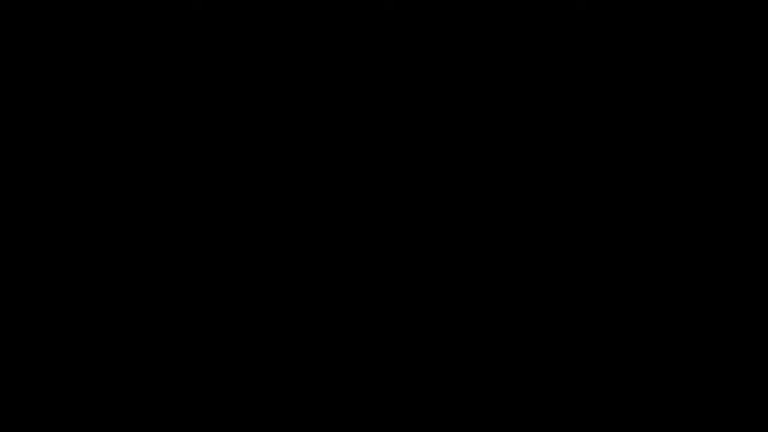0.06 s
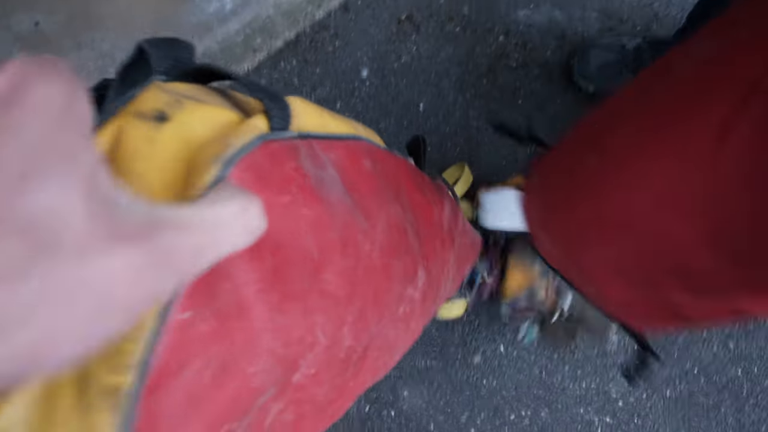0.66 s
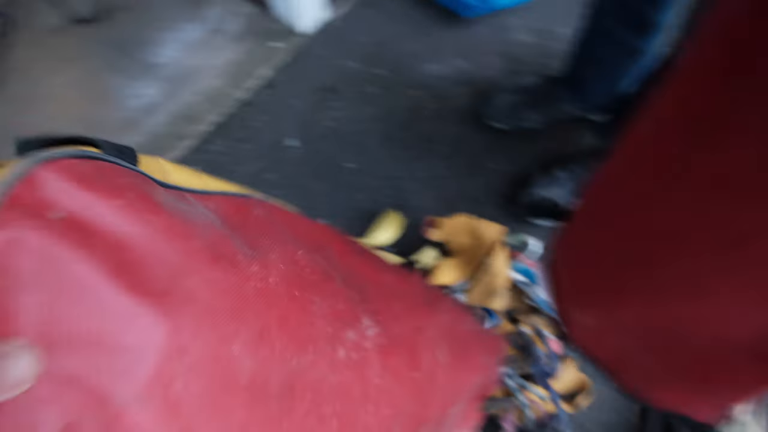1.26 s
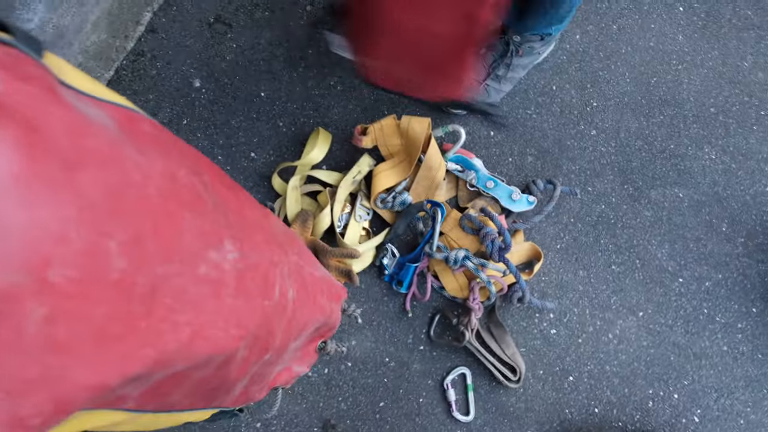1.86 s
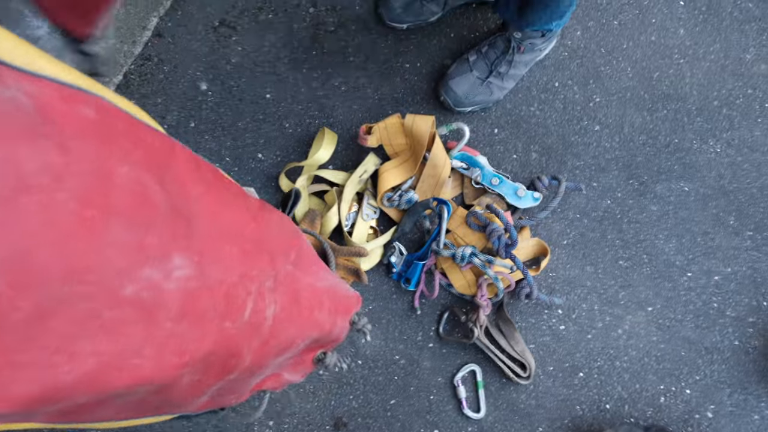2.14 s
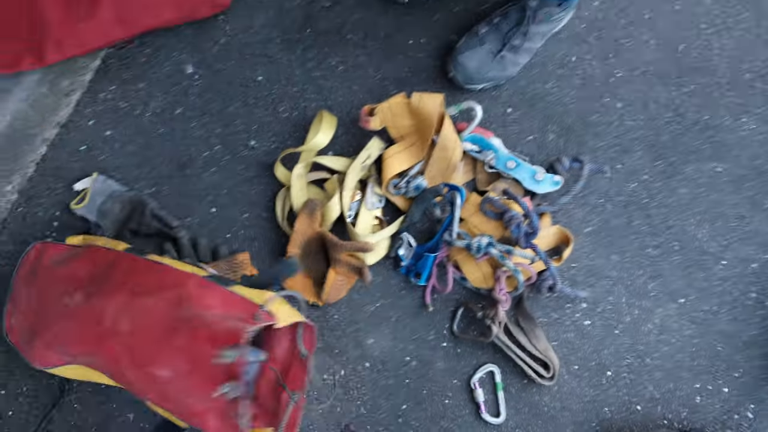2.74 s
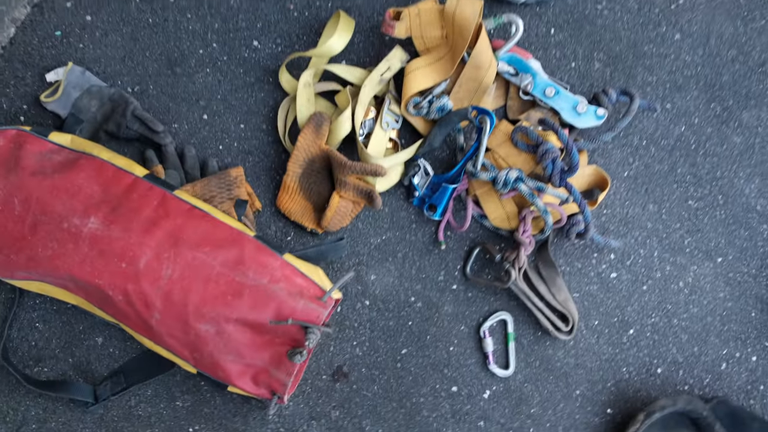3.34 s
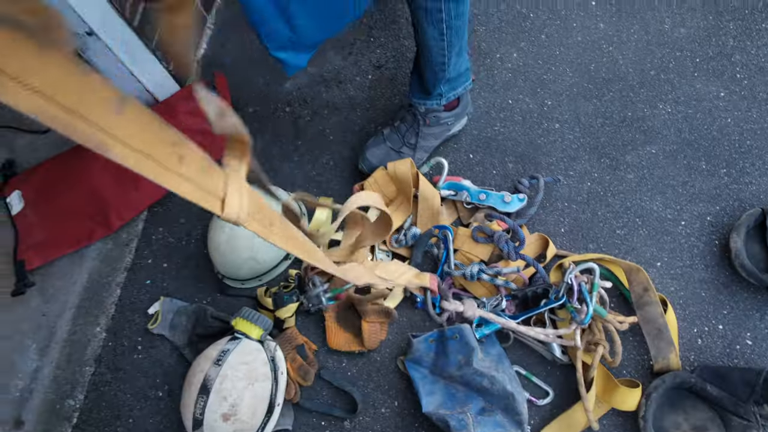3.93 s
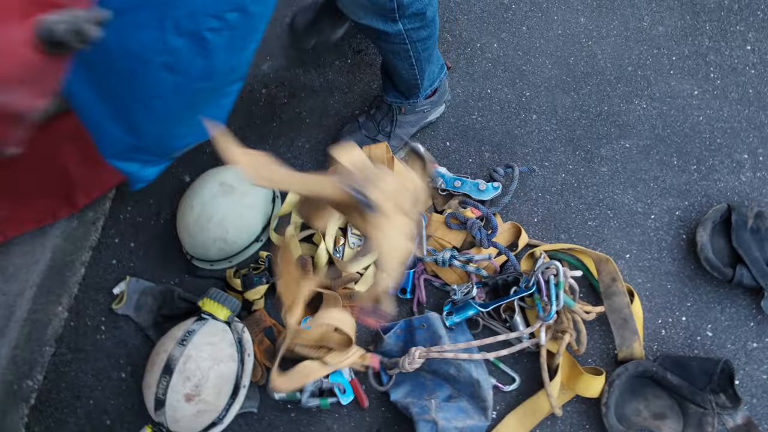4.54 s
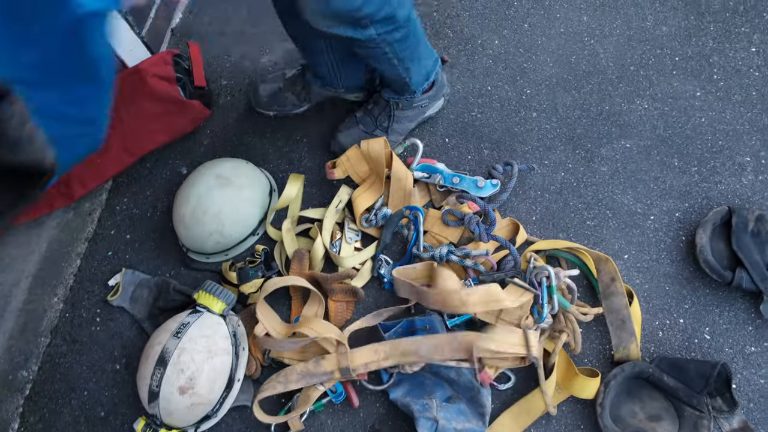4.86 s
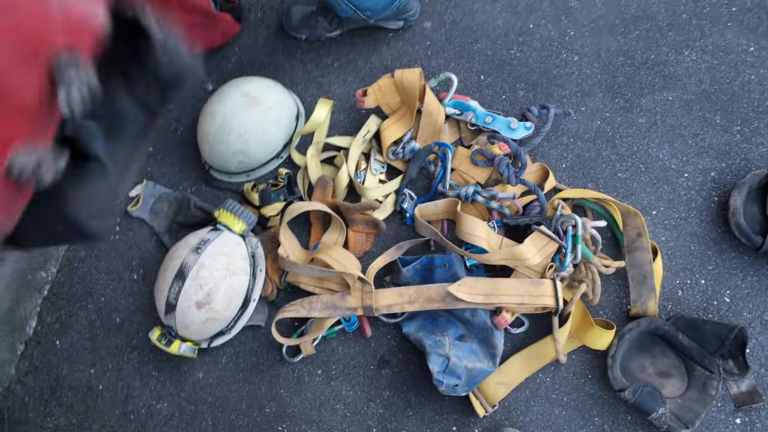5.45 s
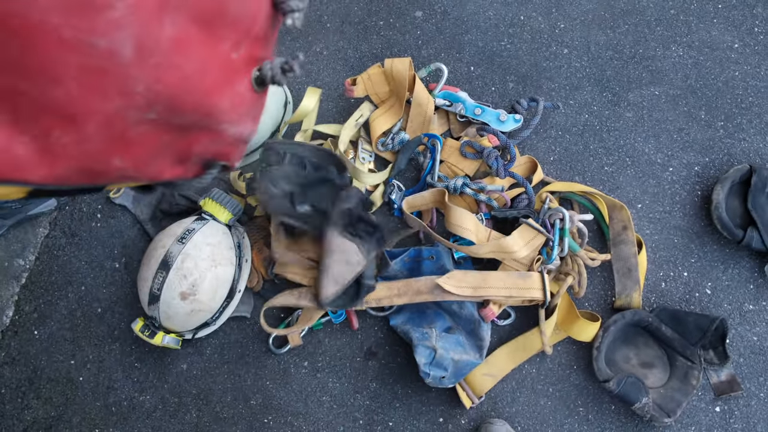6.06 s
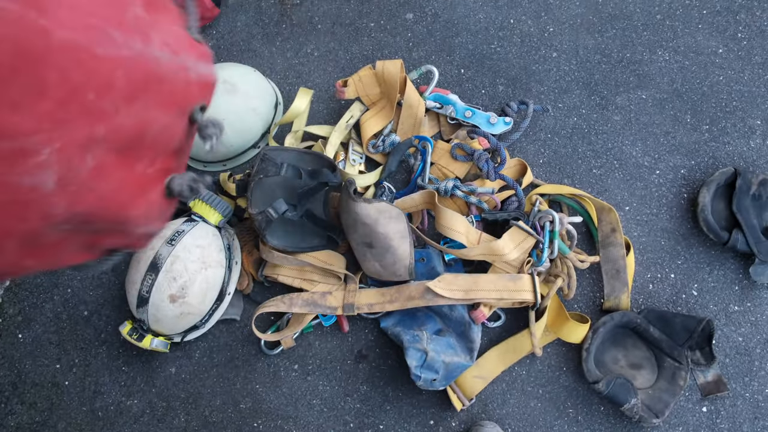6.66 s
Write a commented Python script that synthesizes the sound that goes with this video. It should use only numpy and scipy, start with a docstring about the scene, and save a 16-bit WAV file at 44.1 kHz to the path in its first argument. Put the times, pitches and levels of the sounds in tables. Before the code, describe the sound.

Stiff tarpaulin bags rustle and thump as webbing and clinking metal carabiners are shaken out onto a pile on tarmac outdoors.

```python
"""Outdoors on tarmac: tarpaulin tackle bags are shaken out over climbing gear, an arm's length away.
Webbing drags over the stiff cloth in countless tiny slips; the bag walls crease and thump.
Carabiners clack, mostly muffled by their slings; a few ring on until touched.
Light wind buffets the microphone over a quiet background; a limiter ducks after the hardest hits."""
import sys
import numpy as np
from scipy import signal
from scipy.fft import rfft, irfft, next_fast_len
from scipy.io import wavfile
from scipy.ndimage import uniform_filter1d, minimum_filter1d

SR = 44100
rng = np.random.default_rng(int(sys.argv[2]) if len(sys.argv) > 2 else 0)


def transcribe(signal):
    """Save signal, clipped to [-1, 1], as a 16-bit WAV file at the path in sys.argv[1]."""
    frames = np.atleast_2d(signal).T
    limited = np.clip(frames, -1, 1)
    pcm = np.round(limited * 32767).astype(np.int16)
    wavfile.write(sys.argv[1], SR, pcm)


N = 294896
TIME = np.arange(N) / SR
HIT_TIME = TIME[:SR // 4]
IMPULSE = 1. * (HIT_TIME == 0)

# bag wall flaps or soft gear lands: t/s, thump level/dB, f/Hz, t60/s, fold snap level/dB
FLAPS = [(0.5625, -21.5, 337, 0.1, -32), (0.6605, -18, 322, 0.085, -29), (1.221, -18.5, 342, 0.034, -18),
         (1.2467, -22.5, 290, 0.027, -46), (1.3184, -21, 290, .048, -29.5), (1.392, -21, 228, 0.045, -39),
         (1.795, -22, 274, 0.042, -40), (2.1244, -23, 293, .035, -36), (2.162, -17, 305, 0.075, -22),
         (2.237, -18.5, 400, 0.037, -23), (2.271, -12, 234, 0.02, -24.5), (2.3162, -20, 261, .05, -17),
         (2.3554, -14, 212, 0.026, -29), (2.3756, -12.5, 278, 0.024, -23), (2.449, -10.5, 377, 0.12, -19.5),
         (2.5121, -27, 343, .05, -24), (2.5295, -11.5, 330, 0.064, -17), (2.6151, -10.5, 220, 0.084, -17.5),
         (2.928, -15, 294, .14, -30), (2.951, -14.5, 230, 0.14, -27), (3.277, -30.5, 161, 0.18, -56),
         (4.121, -14, 362, 0.14, -25), (4.133, -11.5, 210, 0.024, -35), (4.693, -21, 410, .05, -29),
         (4.7202, -21, 444, 0.027, -46), (5.1981, -22, 235, 0.054, -34), (5.366, -37, 117, .08, -37),
         (5.655, -17.5, 168, 0.067, -33), (6.341, -18.5, 255, .09, -44), (6.446, -20, 215, 0.052, -35.5),
         (6.6014, -17.5, 348, 0.019, -24), (6.6673, -18, 363, 0.099, -35)]


def rustle(slips_per_s=900, slip_t60_s=0.01, smooth_db=-5, flutter_db=1.72, flicker_db=2.5):
    """Stick-slip releases of uneven size; the cloth's folds keep shifting which bands radiate."""
    # cloth spectrum: f/Hz, level/dB
    cloth = [(45, -1.5), (75, -4), (140, -4.5), (290, -5), (635, -10), (1000, -11.5), (1400, -12),
             (2540, -15), (3410, -18.5), (4600, -18), (7000, -31), (10600, -38), (13300, -44), (16000, -44)]
    low_db, level_db, high_db = 10 * np.log10(drag_power())
    boom_db, hiss_db = low_db - level_db, high_db - level_db
    slips = (rng.random(N) < slips_per_s / SR) * undb(np.minimum(rng.exponential(size=N), 4))
    # each release sets the fibres chattering
    chatter_power = signal.fftconvolve(slips ** 2, fade(slip_t60_s) ** 2)[:N]
    chatter = unit(np.sqrt(abs(chatter_power)))
    drag = np.hypot(chatter, undb(smooth_db)) * rng.standard_normal(N) * undb(flutter_db * walk(110))
    size = next_fast_len(N, real=True)
    spectrum = rfft(unit(colour(drag, cloth)), size)
    octave = np.log2(np.maximum(np.fft.rfftfreq(size, 1 / SR), 1))
    out, step_oct = 0, 2 / 3
    for centre in np.arange(6, 14.5, step_oct):
        band = irfft(spectrum * np.maximum(1 - abs(octave - centre) / step_oct, 0), size)[:N]
        boom = np.interp(centre, np.log2([450, 1400]), [1, 0])
        hiss = np.interp(centre, np.log2([3800, 9000]), [0, 1])
        out = out + band * undb(boom * boom_db + hiss * hiss_db + flicker_db * walk(35))
    return out * undb(level_db)


def drag_power(idle_db=-48.5, idle_boom_db=1.8, idle_hiss_db=0.9):
    """Pulls speed up and die away over a faint shuffle. Rows: bag boom, cloth body, fibre hiss."""
    # webbing or tarpaulin pulled: fastest t/s, attack/s, release/s, level/dB, rel. boom/dB, rel. hiss/dB
    pulls = [(0.453, 0.011, 0.071, -19, -1, 4.5), (0.6, 0.029, 0.057, -25, -1.5, -9),
             (0.68, 0.037, 0.046, -27.5, -0.5, 5), (0.86, 0.22, 0.045, -34, -3.5, 12.5),
             (1.135, 0.085, 0.22, -39, 6, 5.5), (1.42, 0.11, 0.16, -36, 4.5, 7.5),
             (1.515, 0.023, 0.023, -27.5, -7.5, 8.5), (1.588, 0.017, 0.014, -31, -6.5, 11.5),
             (1.70, .07, 0.051, -32.5, -3, 4), (1.93, 0.038, 0.04, -49, 4, -15),
             (2.162, 0.037, 0.04, -30.5, 5, 8.5), (2.31, 0.091, 0.065, -35, 14, 4.5),
             (2.539, 0.029, 0.067, -25, 3.5, 3), (2.88, 0.1, 0.22, -34, 4.5, 3),
             (3.22, 0.089, 0.041, -43, 4, 7), (3.48, 0.2, 0.097, -50, -11, 4),
             (3.681, 0.063, 0.11, -21.5, -5.5, 5.5), (3.89, 0.15, 0.037, -38, 4.5, 2),
             (4.08, 0.16, .05, -38, 1, 5), (4.15, 0.045, 0.039, -31.5, -1, 9),
             (4.243, 0.012, 0.017, -36, 11, 17), (4.369, 0.04, 0.046, -30, -2, 6),
             (4.452, 0.048, 0.086, -22.5, -2.5, 5), (4.72, 0.056, 0.21, -29.5, -10, 1),
             (4.863, .045, 0.026, -18.5, -14.5, 5.5), (4.944, 0.028, 0.062, -24, -8, -0.5),
             (5.081, .08, 0.066, -21, -3.5, -1.5), (5.174, 0.038, 0.067, -22, -7, -1.5),
             (5.37, 0.15, 0.072, -24.5, 1.5, 3.5), (5.461, 0.051, 0.089, -26, 4.5, 10),
             (5.625, 0.072, 0.038, -18, 0.5, -3), (5.732, 0.12, 0.1, -29.5, 3, -1),
             (5.92, 0.12, 0.068, -35, -0.5, 12.5), (6.066, 0.038, 0.053, -30.5, -4.5, 19.5),
             (6.17, 0.053, 0.27, -44, -3, 6), (6.385, 0.036, 0.058, -39, 4, 0),
             (6.47, .015, 0.027, -33.5, 1.5, 4), (6.59, 0.11, 0.036, -32, 5.5, 2.5)]
    power = undb([[idle_db + idle_boom_db], [idle_db], [idle_db + idle_hiss_db]]) ** 2 * np.ones(N)
    for t, attack_s, release_s, db, boom_db, hiss_db in pulls:
        width_s = np.where(TIME < t, attack_s, release_s)
        speed = np.exp(-np.minimum(((TIME - t) / width_s) ** 2, 20))
        power += (undb([[db + boom_db], [db], [db + hiss_db]]) * speed) ** 2
    return power


def hardware():
    """Each piece lands with a bright clack and the duller knock of its weight."""
    # metal on metal or tarmac: t/s, level/dB, f/Hz, spread/oct, t60/s, knock level/dB
    hits = [(0.6036, -21, 3260, 0.31, 0.014, -48), (0.6893, -10.5, 2720, 0.69, 0.011, -22.5),
            (0.7125, -22, 4170, 0.76, .011, -46), (0.7327, -19, 2710, 0.86, 0.024, -33),
            (0.7598, -17.5, 2570, 0.54, 0.012, -20.5), (0.907, -10.5, 2170, 0.79, 0.0064, -56),
            (1.093, -21.5, 5500, 0.86, .012, -33), (1.108, -22.5, 4800, 1.2, .011, -50),
            (1.126, -28, 3300, .6, .035, -39), (1.6362, -19.5, 2520, 0.7, 0.0057, -18),
            (2.532, -16, 2280, 0.53, 0.0084, -23), (2.9635, -26.5, 1940, 0.78, 0.013, -26),
            (3.6126, -16.5, 2200, 0.9, 0.087, -24), (3.6776, -19.5, 3040, 0.64, 0.032, -39),
            (3.7245, -22, 3180, 0.58, 0.045, -36), (3.787, -20, 3650, 0.55, .031, -26.5),
            (3.8264, -23.5, 2620, 0.6, 0.14, -28), (3.8832, -27.5, 2800, 0.5, .028, -32.5),
            (4.1418, -6, 4200, 0.63, 0.057, -23), (4.1723, -18, 3980, .6, 0.1, -40),
            (4.226, -27, 4300, 0.89, 0.024, -46), (4.2848, -36, 3700, 0.63, .036, -51),
            (4.4823, -24, 4400, 1.2, 0.018, -35), (4.5134, -25, 3400, 1.6, .028, -38),
            (4.5441, -4, 4430, 0.32, 0.024, -10), (4.5446, -4, 4650, 0.92, 0.012, -32),
            (4.578, -23, 3400, 1.3, 0.05, -21), (4.6335, -25, 4400, 1.2, .035, -42),
            (4.6759, -27, 3000, 1, 0.11, -30.5), (4.6922, -6, 3140, 0.71, 0.1, -23),
            (4.7151, -15, 3530, 0.76, 0.017, -32), (5.9049, -20.5, 3900, .55, .016, -22.5),
            (5.9644, -36, 4250, 1.2, 0.019, -51), (6.1176, -25, 4460, 0.93, 0.016, -45),
            (6.164, -30, 3360, 0.52, 0.046, -47)]
    out = np.zeros(N)
    for t, db, hz, octaves, t60_s, knock_db in hits:
        knock = pulse(push_db=0.5, t60_s=0.019, hz=1050, octaves=0.89, skirt_db=10.5)
        add(out, t, undb(db) * clack(hz, octaves, t60_s) + undb(knock_db) * knock)
    return out


def clack(hz, octaves, t60_s, tick_db=-3, tail_db=-19, tail_t60_s=0.073, bounce=0.31, ring_db=-16):
    """A hard tick, brief chatter and a ring that the slings choke."""
    # modes of a carabiner held in webbing: f/Hz, level/dB, t60/s
    modes = [(2290, 7, .03), (3365, -15, 0.076), (3600, 16, 0.037), (4110, 17, .05), (4600, 18, 0.024),
             (5539, -11, .05), (6885, -21, .05), (8500, 4, 0.078), (8350, -9, .06), (10610, -17, .06),
             (12100, -9, .05), (13000, -2, 0.047), (15200, -7, .05)]
    contact = undb(tick_db) * blow(IMPULSE) + scatter(t60_s, rise_s=0.00051)
    contact += undb(tail_db) * scatter(tail_t60_s)
    reflection_s = rng.uniform(.0005, .0014)  # off the tarmac just below
    contact += bounce * np.roll(contact, int(reflection_s * SR))
    ring = 0
    for mode_hz, mode_db, mode_t60_s in modes:
        gain = undb(mode_db) * rng.standard_normal()  # strike point picks the modes
        tuned_hz = mode_hz * rng.normal(1, 0.015)  # no two pieces alike
        ring += gain * fade(mode_t60_s) * np.sin(2 * np.pi * tuned_hz * HIT_TIME)
    return blow(hump(contact, hz, octaves, skirt_db=8)) + undb(ring_db) * blow(ring)


def thumps():
    """A soft push swings the bag wall and the air inside for a few cycles."""
    out = np.zeros(N)
    for t, db, hz, t60_s, _ in FLAPS:
        add(out, t, undb(db) * pulse(push_db=1, t60_s=t60_s, hz=hz, octaves=0.6))
    return out


def creases(octaves=0.69):
    """A fold flips with one pulse, then the sheet shivers; every flap flips one too."""
    # stiff cloth creasing by itself: t/s, level/dB, f/Hz
    folds = [(0.5876, -21, 1170), (0.822, -28.5, 690), (1.5644, -31, 1050), (1.581, -32.5, 1053),
             (1.6855, -25, 1460), (1.751, -30.5, 1080), (2.4525, -12.5, 1030), (2.5887, -32, 1260),
             (2.845, -28, 1210), (2.9366, -24, 1300), (3.1599, -27.5, 944.4), (3.17, -30, 1050),
             (3.2952, -33, 1130), (3.312, -32.5, 920), (3.4285, -34.5, 950), (3.4445, -25.5, 1610),
             (3.5264, -28, 865), (4.4459, -19, 1650), (6.0247, -24, 780)]
    out = np.zeros(N)
    for t, db, hz in folds:
        add(out, t, undb(db) * pulse(push_db=2, t60_s=0.031, hz=hz, octaves=octaves))
    for t, _, _, _, db in FLAPS:
        add(out, t, undb(db) * pulse(push_db=-2, t60_s=0.052, hz=773, octaves=octaves))
    return out


def scrapes(rasp_db=2):
    """A short, rasping slide swells and dies in one resonance of the taut cloth."""
    # cloth drawn over an edge: middle t/s, half length/s, level/dB, f/Hz, spread/oct
    slides = [(0.652, 0.044, -27, 4850, 0.52), (1.696, 0.013, -29.5, 2380, 0.11),
              (2.314, 0.0063, -22.5, 1520, 0.43), (2.803, 0.048, -43, 1670, 0.17),
              (4.124, 0.026, -23, 272, 0.63)]
    out = np.zeros(N)
    for t, half_s, db, hz, octaves in slides:
        add(out, t - HIT_TIME.mean(), undb(db) * swell(half_s, hz, octaves, skirt_db=7))
    return out * unit(undb(rasp_db * walk(400)))


def chimes(stop_s=0.003, sway_db=3, falloff_db_per_oct=16):
    """Free metal rings, wavering as it turns, until a sling or neighbour stops it."""
    # strikes on free metal: t/s, stop t/s, level/dB, favoured f/Hz, t60/s, tuning/cents
    strikes = [(0.760, .905, -30, 13500, 0.42, 2.5), (0.765, .905, -37, 6150, 0.39, 1.5),
               (0.857, 0.879, -29, 10600, .4, 7), (0.858, .9, -34, 3800, 0.22, 10),
               (1.148, 1.2, -32, 10500, 0.033, -94), (3.146, 3.26, -59, 4400, 0.4, -145),
               (4.067, 4.14, -33, 4280, 0.11, 5), (4.15, 4.17, -33, 12600, 0.11, 25),
               (4.562, 4.68, -30, 3080, 0.2, 4)]
    # modes of a free carabiner: f/Hz, level/dB
    modes = [(2940, -9), (3365, -3), (3780, -6), (4380, -1), (6720, 2), (8340, -4), (10610, -1), (15000, 1)]
    out = np.zeros(N)
    for t, end_s, db, near_hz, t60_s, cents in strikes:
        touch = np.exp(-np.maximum(t + HIT_TIME - end_s, 0) / stop_s)
        tuning = 2 ** (cents / 1200)
        ring = 0
        for hz, mode_db in modes:
            # strike point favours neighbouring modes
            gain = undb(mode_db - falloff_db_per_oct * abs(np.log2(hz / near_hz)))
            ring += gain * np.sin(2 * np.pi * hz * tuning * HIT_TIME)
        add(out, t, undb(db) * fade(t60_s) * touch * ring)
    return out * undb(sway_db * walk(70))


def jostles(gap_s=0.031, spread_db=2.5):
    """Loose hardware clinks unevenly in its slings while a bundle moves."""
    # bundle moves: start t/s, end t/s, clink level/dB
    moves = [(0.992, 1.07, -40), (1.376, 1.46, -30), (3.696, 3.8, -29), (4.409, 4.46, -27)]
    out = np.zeros(N)
    for start_s, end_s, db in moves:
        for slot_s in np.arange(start_s, end_s, gap_s):
            t = slot_s + gap_s * rng.random()
            gain = undb(db + spread_db * rng.standard_normal())
            add(out, t, gain * clack(hz=3000, octaves=0.59, t60_s=0.0075))
    return out


def echo(x, wet_db=-21, t60_s=0.22, delay_s=.008):
    """Ground and nearby walls return a faint, short, duller echo."""
    response = colour(scatter(t60_s), [(100, 7.0), (4000, 1), (14000, -8)])
    out = np.zeros(N)
    add(out, delay_s, signal.fftconvolve(x, response / np.linalg.norm(response)))
    return undb(wet_db) * out


def wind(trim_db=-2, gustiness_db=2):
    """Gusts rumble and buffets flutter on the microphone."""
    # wind and handling: t/s, level before trim/dB
    gusts = [(0.45, -27), (0.9, -47), (1.28, -31), (1.65, -30), (2.35, -34), (2.67, -45), (2.9, -33),
             (3.4, -40), (3.55, -27.5), (3.72, -42), (4.5, -37.5), (5.25, -38.5), (5.36, -30), (6.25, -38),
             (6.6, -28.5)]
    # rumble spectrum: f/Hz, level/dB
    spectrum = [(12, -6), (30, 14), (60, -3), (100, -38), (170, -18), (400, -49)]
    # air pushed by a swinging bag: middle t/s, half length/s, level/dB
    buffets = [(1.273, 0.096, -33.5), (1.467, 0.047, -31.5), (5.377, 0.013, -14), (5.511, 0.018, -19.5),
               (5.68, 0.032, -26.5)]
    gust_db = np.interp(TIME, *np.transpose(gusts))
    rumble = unit(colour(rng.standard_normal(N), spectrum))
    out = rumble * undb(gust_db + trim_db + gustiness_db * walk(8.6))
    for t, half_s, db in buffets:
        add(out, t - HIT_TIME.mean(), undb(db) * swell(half_s, hz=90, octaves=0.42, skirt_db=12))
    return out


def outdoors(level_db=-57.5):
    """A nearly steady distant wash."""
    # background spectrum: f/Hz, level/dB
    spectrum = [(35, -19), (60, 8), (87, -4), (172, -11), (636, -18), (767, -13), (2050, -22), (4120, -20),
                (13300, -31), (16000, -42)]
    return unit(colour(rng.standard_normal(N), spectrum)) * undb(level_db + walk(3.4))


def limiter(x, ceiling_db=-7, recover_db_per_s=85, hold_s=0.016, attack_s=0.004, range_db=10):
    """A peak over the ceiling pulls the gain down; it holds a moment and creeps back."""
    over_db = np.clip(20 * np.log10(abs(x) + 1e-9) - ceiling_db, 0, range_db)
    size = int(hold_s * SR) // 2 * 2 + 1
    held_db = -minimum_filter1d(-over_db, size, origin=size // 2)
    recovery_db = recover_db_per_s * TIME
    duck_db = np.maximum.accumulate(held_db + recovery_db, axis=-1) - recovery_db
    pole = np.exp(-1 / (attack_s * SR))
    return x * undb(-signal.lfilter([1 - pole], [1, -pole], duck_db))


def pulse(push_db, t60_s, hz, octaves, skirt_db=10):
    """One push and the shiver after it, through a broad resonance."""
    force = undb(push_db) * blow(IMPULSE) + scatter(t60_s)
    return blow(hump(force, hz, octaves, skirt_db))


def swell(half_s, hz, octaves, skirt_db):
    """Noise in a broad resonance, growing and dying around the middle of HIT_TIME."""
    noise = unit(hump(rng.standard_normal(len(HIT_TIME)), hz, octaves, skirt_db))
    return noise * np.exp(-((HIT_TIME - HIT_TIME.mean()) / half_s) ** 2 / 2)


def scatter(t60_s, rise_s=0.00084):
    """Tiny contacts that build as surfaces meet, then fade."""
    return blow(rng.standard_normal(len(HIT_TIME)) * fade(t60_s) * (1 - np.exp(-HIT_TIME / rise_s)))


def hump(x, hz, octaves, skirt_db):
    """Causal broad resonance at hz; the skirts fall by skirt_db per spread in octaves."""
    f = np.maximum(np.fft.rfftfreq(len(x), 1 / SR), 10)
    spreads = np.log2(f / hz) / octaves
    gain = undb(-skirt_db * (np.hypot(1, spreads) - 1))
    cepstrum = irfft(np.log(gain + 1e-4), len(x))
    cepstrum[1:] *= 2  # fold to minimum phase
    cepstrum[len(x) // 2:] = 0
    return irfft(rfft(x) * np.exp(rfft(cepstrum)), len(x))


def colour(x, points):
    """Filter by a spectrum of (f/Hz, level/dB) points."""
    hz, db = np.transpose(points)
    size = next_fast_len(len(x), real=True)
    f = np.maximum(np.fft.rfftfreq(size, 1 / SR), 1)
    gain = undb(np.interp(np.log(f), np.log(hz), db))
    return irfft(rfft(x, size) * gain, size)[:len(x)]


def walk(rate_hz):
    """Smooth random drift, rms 1."""
    step = int(SR / rate_hz)
    stairs = np.repeat(rng.standard_normal(N // step + 1), step)
    return unit(uniform_filter1d(stairs, step)[:N])


def fade(t60_s):
    """Exponential decay, 60 dB down after t60_s."""
    return np.exp(-np.log(1000) * HIT_TIME / t60_s)


def blow(x):
    """Scale a hit to the energy of 5 ms at rms 1."""
    return x / np.sqrt(np.sum(x ** 2) / (.005 * SR))


def unit(x):
    """Scale to rms 1."""
    return x / np.sqrt(np.mean(x ** 2))


def undb(db):
    """Decibels to gain."""
    return np.exp(np.asarray(db) * np.log(10) / 20)


def add(out, start_s, x):
    """Mix x into out from start_s on."""
    i = int(start_s * SR)
    out[i:i + len(x)] += x[:max(N - i, 0)]


def scene():
    """Cloth, metal and open air at one microphone."""
    air = wind() + outdoors()
    gear = rustle() + scrapes() + creases() + thumps() + chimes() + hardware() + jostles()
    return (gear + echo(gear) + air)[None]


def record(dry, start_s=.45, clip_level=.78, top_hz=15800):
    """Limiter, soft clipping, silence until start_s, low-pass."""
    held = limiter(dry)
    rounded = held / (1 + (held / clip_level) ** 4) ** (1 / 4)
    top_cut = signal.ellip(8, .1, 50, top_hz, fs=SR, output="sos")
    return signal.sosfiltfilt(top_cut, rounded * (TIME >= start_s))


dry = scene()
out = record(dry)
transcribe(out)
```